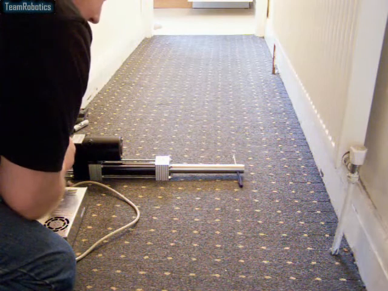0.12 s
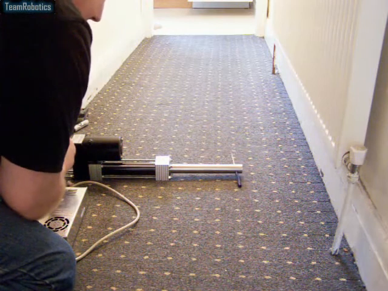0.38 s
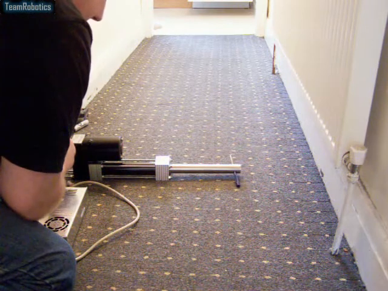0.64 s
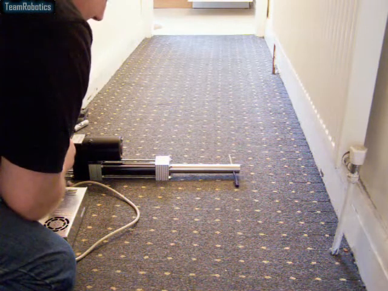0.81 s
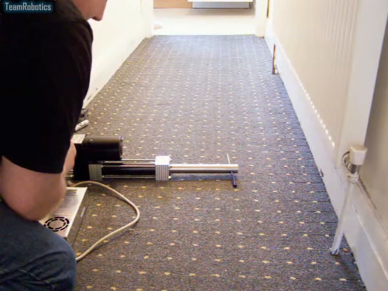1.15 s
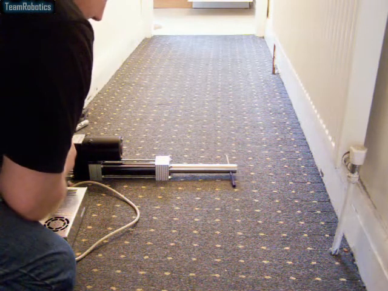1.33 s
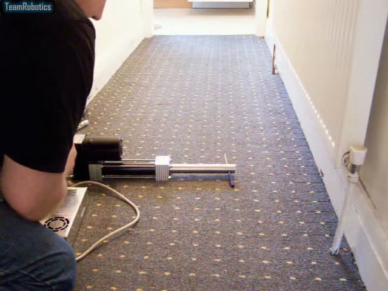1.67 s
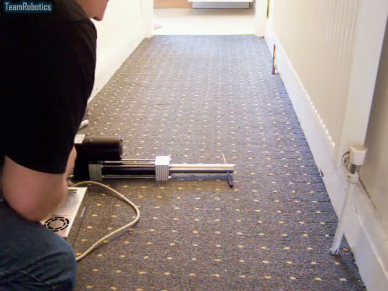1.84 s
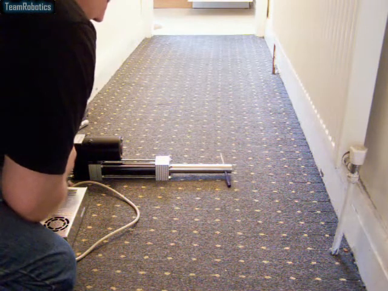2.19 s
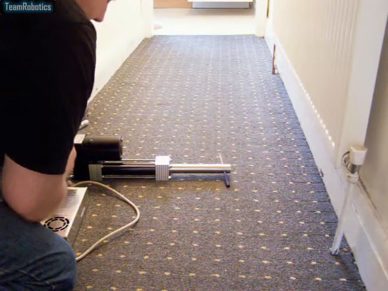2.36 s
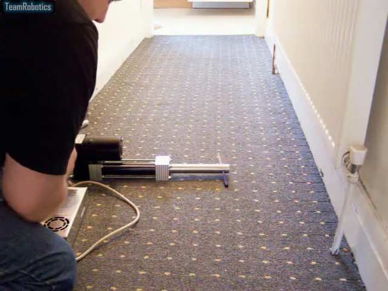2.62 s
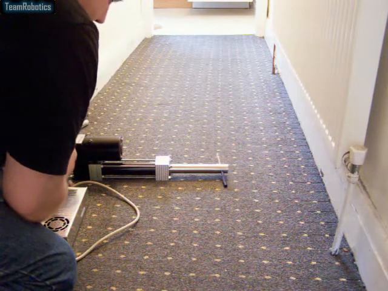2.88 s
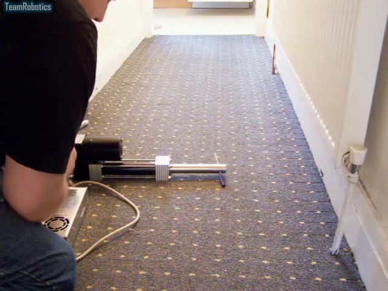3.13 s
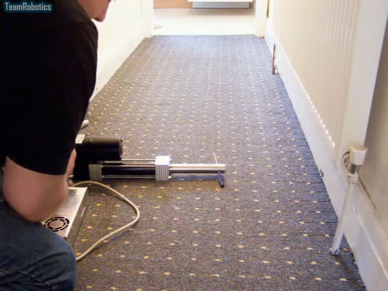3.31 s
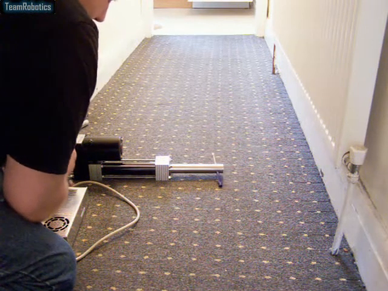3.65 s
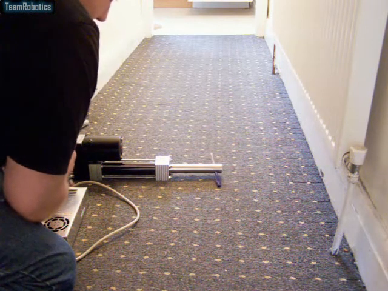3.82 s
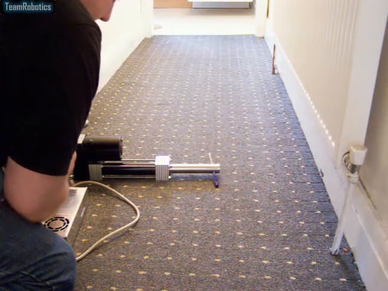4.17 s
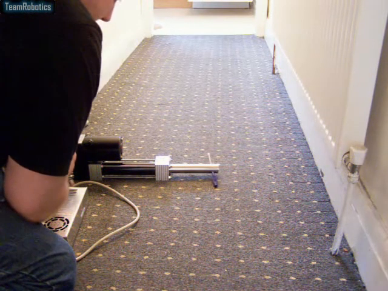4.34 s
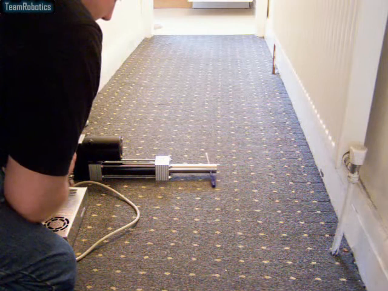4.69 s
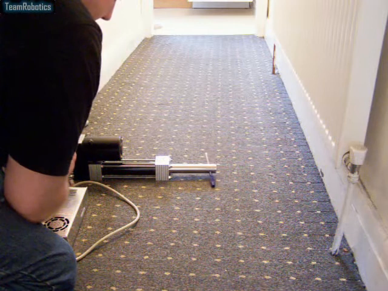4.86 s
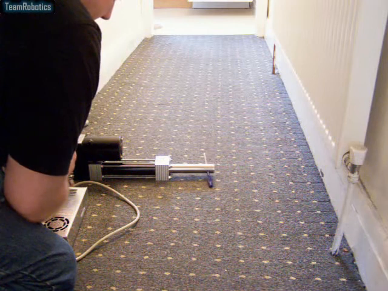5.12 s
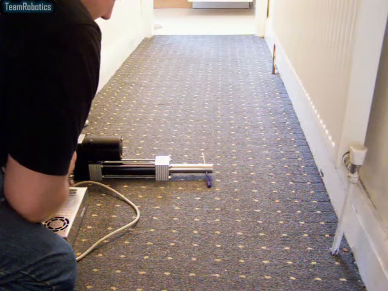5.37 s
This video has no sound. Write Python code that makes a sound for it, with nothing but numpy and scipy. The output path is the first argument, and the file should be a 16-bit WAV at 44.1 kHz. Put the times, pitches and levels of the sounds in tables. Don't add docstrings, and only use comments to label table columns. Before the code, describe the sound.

A small geared motor whirrs brightly and steadily indoors, then its sliding rod begins squealing in rapid rhythmic chirps that sink lower and fade.

```python
import sys
import numpy as np
from scipy import signal
from scipy.fft import rfft, irfft
from scipy.io import wavfile
from scipy.ndimage import uniform_filter1d

SR = 44100
rng = np.random.default_rng(int(sys.argv[2]) if len(sys.argv) > 2 else 0)


def voltage_ratio(level):
    return 10 ** (np.asarray(level, float) / 20)


def dump(signal):
    limited = np.clip(np.atleast_2d(signal).T, -1, 1)
    pcm = np.round(limited * 32767).astype(np.int16)
    wavfile.write(sys.argv[1], SR, pcm)


N = 242550

SHAFT_HZ, SCREW_HZ = 36.318, 5.4477
HALL_T60_S = 0.24


def rms_one(x):
    return x / np.sqrt(np.mean(x ** 2) + 1e-20)


def drift(rate_hz):
    r = np.exp(-2 * np.pi * rate_hz / SR)
    noise = rng.standard_normal(N + SR)
    return rms_one(signal.lfilter([1], [1, -2 * r, r * r], noise)[SR:])


def shaped(x, gain_at):
    return irfft(rfft(x) * gain_at(np.arange(N // 2 + 1) * SR / N + 1e-3), N)


def at_hz(points, hz):
    table_hz, table_db = np.transpose(points)
    return voltage_ratio(np.interp(np.log(hz), np.log(table_hz), table_db))


def resonance(hz, centre_hz, width_hz):
    return 1 / (1 + 2j * (hz - centre_hz) / width_hz)


def turning(hz, phase=0.):
    return np.cos(2 * np.pi * hz * np.arange(N) / SR + phase)


def hallway(x, t60_s, wet_db):
    age = np.arange(int(.4 * SR)) / SR
    tail = rng.standard_normal(len(age)) * voltage_ratio(-60 * age / t60_s) * (age > .003)
    tail = tail / np.sqrt(np.sum(tail ** 2))
    return x + voltage_ratio(wet_db) * signal.fftconvolve(x, tail)[:N]


def looped(turn_hz):
    pattern = rng.standard_normal(SR)
    return pattern[(np.arange(N) % (SR / turn_hz)).astype(int)]


def contacts(shaft_share, mesh_share):
    new_share = np.clip(1 - shaft_share - mesh_share, 0, 1)
    by_shaft = np.sqrt(abs(shaft_share)) * looped(SHAFT_HZ)
    by_mesh = np.sqrt(abs(mesh_share)) * looped(SCREW_HZ / 3)
    return by_shaft + by_mesh + np.sqrt(new_share) * rng.standard_normal(N)


# [f/Hz, level/dB per Hz]
RATTLE = [(250, -39.5), (360, -45.5), (450, -34.5), (800, -33.5), (1000, -29), (1150, -31.5), (1300, -31),
          (1450, -22.5), (1750, -9), (2000, -5.5), (3050, 1), (4200, -5.5), (5000, -17.5), (7100, -24.5)]
# [f/Hz, level/dB rms]
HOUSING_MODES = [(1453, -57), (1561, -66), (1599, -62.5), (1631, -52), (1776, -54.5), (1927, -38),
                 (1997, -38.5), (2326, -38.5), (2396, -35), (2514, -33), (2611, -41.5), (2686, -53),
                 (2767, -54), (2799, -54), (2934, -46.5), (3042, -31), (3165, -30.5), (3391, -32),
                 (3478, -37), (3650, -38.5), (3731, -36.5), (3854, -41), (4129, -45.5), (4285, -44.5),
                 (4930, -59.5), (5380, -47.5), (5478, -47), (6164, -53.5), (6378, -51.5)]


def housing(hz, width_share):
    modes = sum(voltage_ratio(db + 38.0) ** 2 * abs(resonance(hz, mode_hz, width_share * mode_hz)) ** 4
                for mode_hz, db in HOUSING_MODES)
    return np.sqrt(at_hz(RATTLE, hz) ** 2 + modes)


# [f/Hz, level/dB, side tone one screw turn lower: relative level/dB]
SHAFT_TONES = [(435.9, -69, -9), (508.5, -65, -9), (544.5, -67, -3), (581.1, -65, -9), (608.8, -64, -9),
               (653.6, -66, -9), (690.1, -67, -9), (817.1, -66, -9), (865.2, -58, -8), (980.6, -57, -2),
               (1016.9, -59, -3), (1089.5, -55, -5), (1409.8, -58, -9), (1597.8, -60, -2),
               (1634.2, -54, -1), (1930.0, -47, -4), (2322.9, -49, -9)]


def tones(wander_db):
    out = np.zeros(N)
    phases = rng.random((len(SHAFT_TONES), 2)) * 2 * np.pi
    for (hz, db, side_db), phase in zip(SHAFT_TONES, phases):
        pair = turning(hz, phase[0]) + voltage_ratio(side_db) * turning(hz - SCREW_HZ, phase[1])
        out += np.sqrt(2) * voltage_ratio(db + wander_db * drift(1.9)) * pair
    return out


# [f/Hz, level/dB per Hz]
RUMBLE = [(20, -21.5), (48, 2), (70, 2.5), (95, 4), (140, -16.5), (200, -22), (400, -45.5)]
# [t/s, level/dB relative to the whirr]
DRAG = [
    (0, -36.5),
    (3.6, -38),
    (4.1, -28.5),
    (5.5, -29),
]


def carpet():
    rumble = rms_one(shaped(rng.standard_normal(N), lambda hz: at_hz(RUMBLE, hz)))

    def pile(hz):
        return abs(resonance(hz, 320, 62)) + 0.57 * abs(resonance(hz, 550, 260))

    brushing = rms_one(shaped(rng.standard_normal(N), pile))
    drag_db = np.interp(np.arange(N) / SR, *np.transpose(DRAG))
    return voltage_ratio(-35) * rumble + voltage_ratio(drag_db) * brushing


WHIRR_DB, LOW_BODY_DB, RIPPLE_DB = -19.5, -21.5, -10
SHOULDER_LONG_DB, SHOULDER_SHORT_DB, SHOULDER_HALF_S, SHOULDER_SPREAD_S = -14.5, -24, 3, 0.24
HUM_TOP_DB, HUM_TOP_S, HUM_SAG_DB = -47.5, 2.3, 1.7


def whirr():
    t = np.arange(N) / SR
    shortened = 1 / (1 + np.exp((SHOULDER_HALF_S - t) / SHOULDER_SPREAD_S))
    shoulder_db = SHOULDER_LONG_DB + (SHOULDER_SHORT_DB - SHOULDER_LONG_DB) * shortened
    hum_db = HUM_TOP_DB - HUM_SAG_DB * (t - HUM_TOP_S) ** 2

    hz = np.arange(N // 2 + 1) * SR / N + 1e-3
    colour = housing(hz, width_share=0.016)
    under_low, under_mid, under_top = (1 / (1 + (hz / edge_hz) ** 12) for edge_hz in (1280, 1850, 4900))
    regions = (under_low, under_mid - under_low, under_top - under_mid, 1 - under_top)
    rattle = hallway(contacts(shaft_share=0.11, mesh_share=0.08), HALL_T60_S, RIPPLE_DB)
    low, shoulder, mid, top = (rms_one(shaped(rattle, lambda hz: colour * part)) for part in regions)

    wobble = turning(SCREW_HZ, 0.32)
    shudder = drift(25)
    mid = mid * voltage_ratio(1.2 + 0.55 * wobble + .5 * turning(SHAFT_HZ) + 0.44 * shudder)
    low_throb_db = wobble + 1.2 * turning(3 * SHAFT_HZ) + turning(SHAFT_HZ) + .3 * shudder
    low = low * voltage_ratio(LOW_BODY_DB + low_throb_db)
    top_db = -5.0 + 0.21 * (shoulder_db - shoulder_db[0])
    brush_ticks = turning(24 * SCREW_HZ)
    top = top * voltage_ratio(top_db + .8 * wobble + 1.0 * brush_ticks + 0.18 * shudder)
    shoulder = shoulder * voltage_ratio(shoulder_db + 0.46 * wobble + .6 * turning(2 * SHAFT_HZ))

    lines_db = top_db - np.mean(top_db) - WHIRR_DB + 5.0 + 0.96 * wobble
    lines = tones(wander_db=2.5) * voltage_ratio(lines_db)
    tooth_mesh = turning(50 * SCREW_HZ)
    hum = np.sqrt(2) * voltage_ratio(hum_db + 2.9 * wobble + 1.0 * drift(22)) * tooth_mesh
    return voltage_ratio(WHIRR_DB) * (mid + low + shoulder + top + lines + carpet()) + hum


# [t/s, settled f/Hz, grip level/dB, loss once the pitch is reached/dB]
TIGHT = [
    (2.25, 4930, -23, 7),
    (2.34, 4740, -29, -2),
    (2.43, 4620, -21, 5),
    (2.53, 4730, -19, 6),
    (2.8, 4840, -17.5, 10),
    (2.89, 4680, -17.5, 7),
    (2.99, 4710, -18.5, 7),
    (3.17, 4730, -18.5, 1),
    (3.27, 4720, -17.5, 3),
]
EASING = [
    (3.35, 4540, -16.5, 4),
    (3.45, 4520, -16, 6),
    (3.54, 4710, -20.5, 3),
    (3.62, 4520, -17.5, 4),
    (3.72, 4500, -16, 10),
    (3.81, 4430, -13.5, 9),
    (3.91, 4420, -13.5, 8),
]
LOOSE = [
    (3.99, 4080, -19, 1),
    (4.18, 3900, -17.5, 1),
    (4.45, 3960, -18.5, 2),
    (4.55, 4050, -23, -1),
    (4.64, 4030, -19, 1),
    (4.82, 3800, -21, -2),
    (4.92, 4030, -23, 1),
    (5.01, 4030, -25, 2),
    (5.1, 3850, -28, 2),
]
FIRST_STROKE_S, STROKE_COUNT = 2.251, 32
CLIMB_FROM_HZ, EASING_CLIMB_HZ, LOOSE_CLIMB_HZ, LOOSE_SHARE = 3650, 500, 150, .625
FADE_SHARE = 1.4


def strokes():
    start = FIRST_STROKE_S + np.arange(STROKE_COUNT) / (2 * SCREW_HZ)
    s, *columns = np.transpose([*TIGHT, *EASING, *LOOSE])
    top_hz, grip_db, loss_db = (np.interp(start, s, c) for c in columns)
    easing = start > EASING[0][0] + 1 / SCREW_HZ / 4
    loose = start > LOOSE[0][0]
    tight_climb_hz = top_hz - CLIMB_FROM_HZ
    climb_hz = np.where(loose, LOOSE_CLIMB_HZ, np.where(easing, EASING_CLIMB_HZ, tight_climb_hz))
    levels = [grip_db, grip_db - loss_db, grip_db - FADE_SHARE * loss_db]
    return start, top_hz, climb_hz, LOOSE_SHARE * loose, levels


# [f/Hz, width/Hz, level/dB]
TUBE = [(3860, 70, 2), (3975, 70, 2), (4090, 90, 3), (4470, 160, 3), (4720, 80, 2)]
GRIP_S, ARRIVE_S, FADE_S = .027, .054, .078
LINGER_S, LINGER_DB = .022, -3
RASP_PER_KHZ_DB = 1.5
LOOSE_RASP_DB = -5


def squeal(climb_hz_per_s, jitter_hz, loose_hz, flutter_db, rasp_db, rasp_hz):
    start, top_hz, climb_hz, looseness, levels = strokes()
    t = np.arange(N) / SR
    k = np.clip(np.searchsorted(start, t) - 1, 0, None)
    age = np.clip(t - start[k], 0, None)
    climb = climb_hz[k]
    below_hz = climb * np.exp(-(age * climb_hz_per_s / (climb + 250)) ** 2)

    loose = looseness[k]
    settled_hz = top_hz[k] + loose * (np.interp(t, start + 0.067, top_hz) - top_hz[k])
    ragged_hz = (jitter_hz + .1 * below_hz + loose_hz * loose) * drift(180)
    hz = settled_hz - (1 - loose) * below_hz + ragged_hz

    knots = (start[:, None] + [GRIP_S, ARRIVE_S, FADE_S]).ravel()
    knot_db = np.transpose(levels).ravel()
    level_db = np.interp(t, [start[0] - .03, *knots, knots[-1] + 0.056], [-60, *knot_db, -60])
    grips = np.cos(2 * np.pi * 6 * SCREW_HZ * (age - GRIP_S))
    beads = turning(2 * SHAFT_HZ)
    grip_db = flutter_db * (drift(79) + (1 - loose) * grips + loose * beads)
    grip_db = grip_db - 2.0 - loose + 2.5 * np.sin(np.pi * below_hz / climb) - below_hz / 300
    slips = np.sqrt(2) * np.sin(2 * np.pi * np.cumsum(hz) / SR) * voltage_ratio(grip_db)

    rasp_centre_hz = top_hz[k] - rasp_hz - .35 * climb
    rasp = np.sqrt(2) * drift(450) * np.sin(2 * np.pi * np.cumsum(rasp_centre_hz) / SR)
    rasp_level_db = uniform_filter1d(level_db, size=1800) + rasp_db
    rasp_level_db = rasp_level_db + LOOSE_RASP_DB * loose + RASP_PER_KHZ_DB * climb / 1000
    voice = voltage_ratio(level_db) * slips + voltage_ratio(rasp_level_db) * rasp

    before = np.clip(k - 1, 0, None)
    held_hz = top_hz[before] + jitter_hz * drift(180)
    linger = voltage_ratio(levels[2][before] + LINGER_DB) * np.exp(-(age / LINGER_S) ** 4) * (k > 0) * (loose == 0)
    held = np.sqrt(2) * np.sin(2 * np.pi * np.cumsum(held_hz) / SR)
    voice = voice + uniform_filter1d(linger, size=130) * held
    return shaped(voice, lambda hz: .6 + sum(voltage_ratio(db) / 2 * resonance(hz, *mode) for *mode, db in TUBE))


SQUEAL_DB, ECHO_DB = -0.5, -5


def scene():
    cry = squeal(climb_hz_per_s=58000, jitter_hz=25, loose_hz=65, flutter_db=2.3, rasp_db=-2.5, rasp_hz=120)
    return (whirr() + voltage_ratio(SQUEAL_DB) * hallway(cry, HALL_T60_S, ECHO_DB))[None]


HOLD_LEVEL_DB, GAIN_FOLLOW_S = -18.5, 0.05


def gain_control(x):
    r = np.exp(-1 / (GAIN_FOLLOW_S * SR))
    power, _ = signal.lfilter([1 - r], [1, -r], x ** 2, zi=[np.mean(x[:SR] ** 2)])
    return x * voltage_ratio(HOLD_LEVEL_DB - 10 * np.log10(power))


def top_cut(x):
    return signal.sosfilt(signal.butter(12, 9200, fs=SR, output="sos"), x)


def record(dry):
    held = gain_control(dry[0])
    direct = shaped(held, lambda hz: 1 / np.sqrt(1 + (hz / 7170) ** 130))

    def mirror_band(hz):
        return (abs(hz - 8710) < 450) * abs(resonance(hz, 8820, 290)) ** 2

    leak = shaped(held * turning(16000), mirror_band)
    mix = direct + voltage_ratio(-27.0) * leak
    return top_cut(mix[None])


dry = scene()
out = record(dry)
dump(out)
```